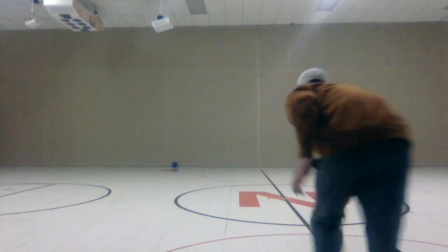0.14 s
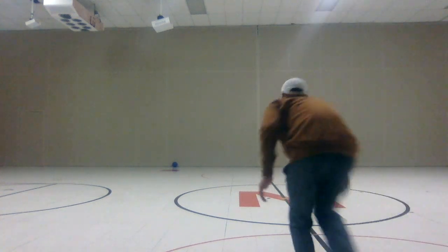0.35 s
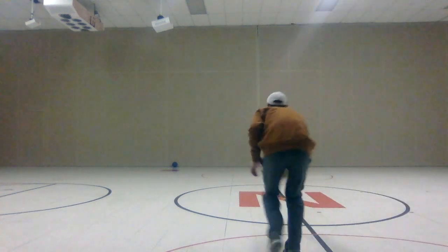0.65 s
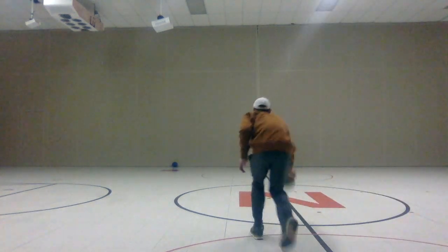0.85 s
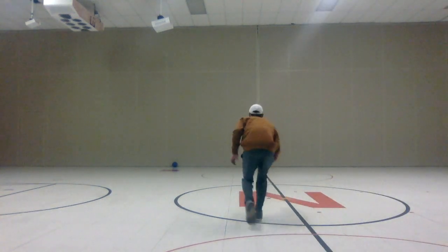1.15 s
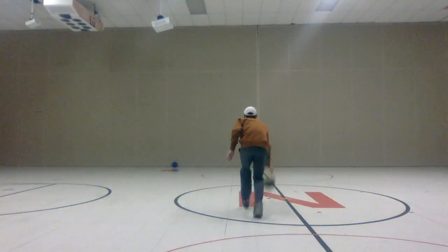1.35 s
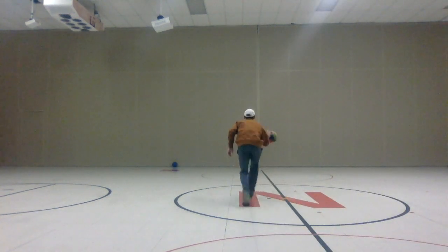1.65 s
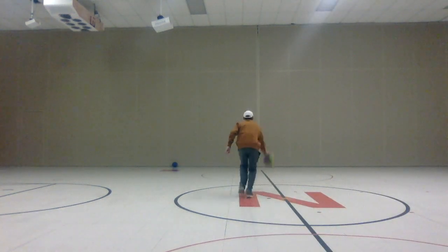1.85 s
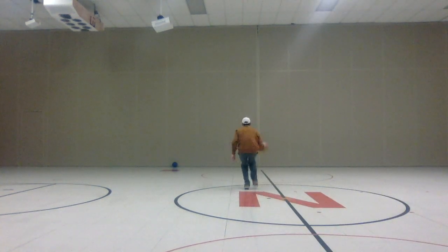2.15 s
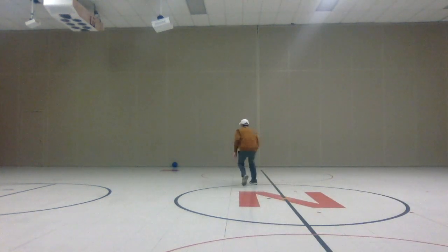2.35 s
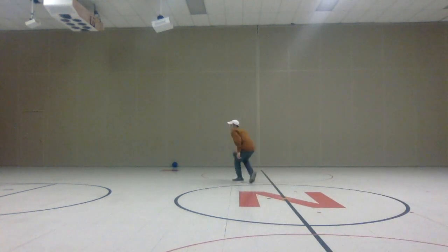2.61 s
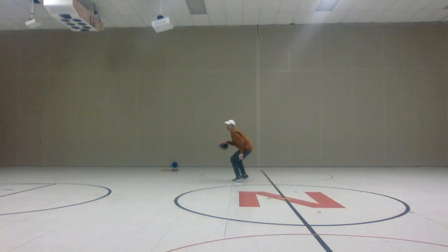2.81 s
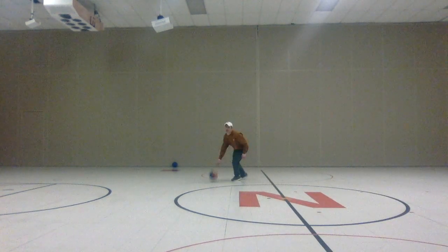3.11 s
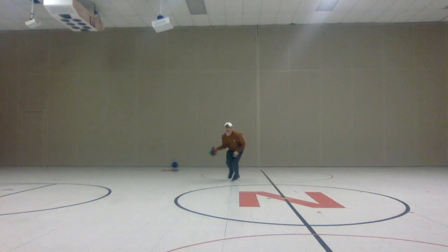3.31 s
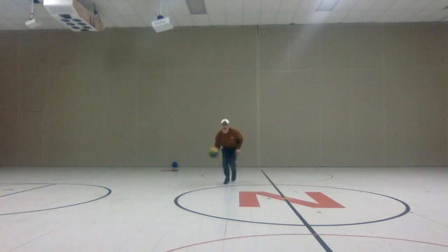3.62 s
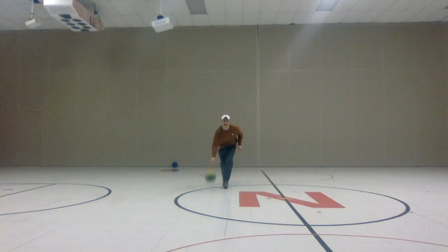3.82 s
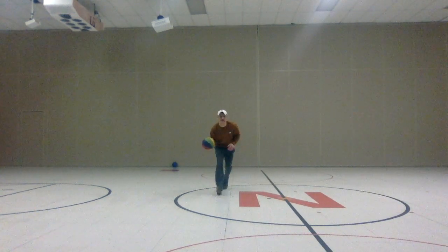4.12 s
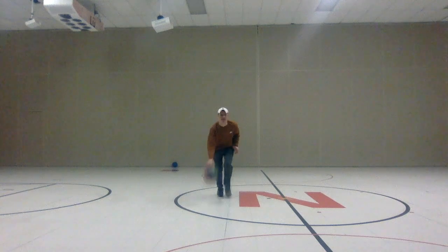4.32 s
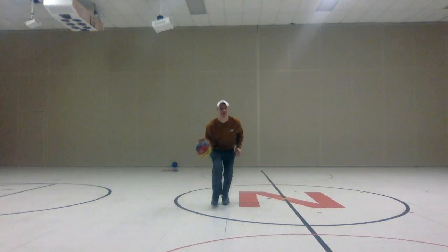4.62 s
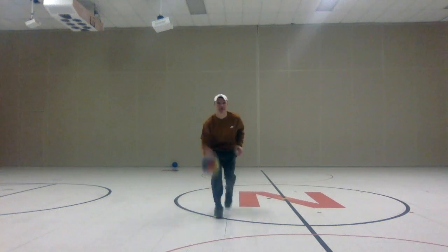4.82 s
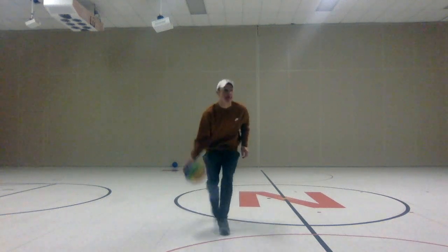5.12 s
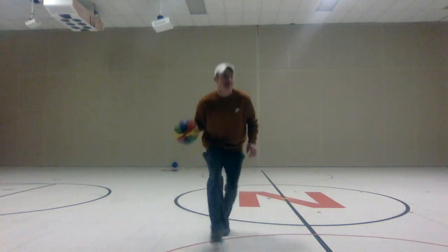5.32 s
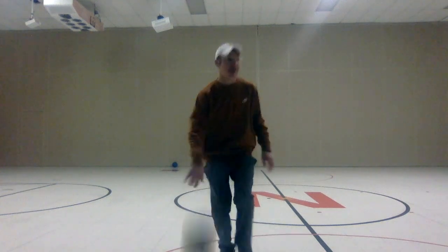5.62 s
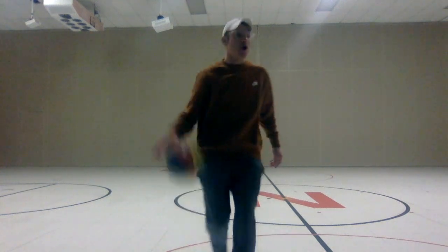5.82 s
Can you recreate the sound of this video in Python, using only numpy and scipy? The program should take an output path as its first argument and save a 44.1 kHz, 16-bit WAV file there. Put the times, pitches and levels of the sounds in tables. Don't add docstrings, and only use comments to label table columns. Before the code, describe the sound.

A rubber ball is dribbled steadily on a hard gym floor, ten sharp echoing slaps receding from the microphone and coming back.

```python
import sys
import numpy as np
from scipy import signal
from scipy.fft import rfft, irfft
from scipy.io import wavfile
from scipy.ndimage import map_coordinates

SR = 44100
rng = np.random.default_rng(int(sys.argv[2]) if len(sys.argv) > 2 else 0)


def generate_wav(sig):
    pcm = np.round(np.clip(np.atleast_2d(sig).T, -1, 1) * 32767).astype(np.int16)
    wavfile.write(sys.argv[1], SR, pcm)


def magnitude_from_level(level_db):
    exponent = np.asarray(level_db, float) / 20
    return 10 ** exponent


N = 262511


def at_hz(points, hz):
    table_hz, values = np.transpose(points)
    return np.interp(np.log(hz), np.log(table_hz), values)


def ring(hz, t60):
    t = np.arange(round(.12 * SR)) / SR
    return np.sin(2 * np.pi * hz * t) * magnitude_from_level(-60 * t / t60)


def add(track, s, sound):
    i = round(s * SR)
    track[i:i + len(sound)] += sound[:N - i]


def ventilation():
    # f/Hz, level/dB
    duct_colour = [(15, -38), (25, -43), (58, -7.5), (97, -11), (134, -5), (206, -15), (293, -7.5),
                   (560, -17.5), (695, -9), (818, -15), (962, -8.5), (1100, -14), (1370, -13),
                   (3430, -32.5), (16000, -63.5)]
    # t/s, level/dB
    background_level = [(0, -54), (.1, -58), (.3, -58.5), (.8, -55), (5.95, -54.5)]
    hz = np.fft.rfftfreq(N, 1 / SR) + 1
    air = irfft(rfft(rng.standard_normal(N)) * magnitude_from_level(at_hz(duct_colour, hz)), N)
    s, db = np.transpose(background_level)
    return air / air.std() * magnitude_from_level(np.interp(np.arange(N) / SR, s, db))


def slap(treble_db):
    # f/Hz, level/dB, t60/s
    skin_modes = [(3810, -3.5, 0.0029), (6400, -2, 0.0013), (2600, 2.5, 0.0032), (9300, -7.5, 0.0026),
                  (3080, -12, 0.0024)]
    sound = np.zeros(round(.12 * SR))
    for hz, db, t60 in skin_modes:
        spread_db = 2.5 * rng.standard_normal()
        sound -= magnitude_from_level(-7 + db + spread_db) * ring(hz, t60)
    sound[:5] -= magnitude_from_level(2.5) * np.hanning(5)
    sound = signal.lfilter(*signal.butter(2, 1900, "high", fs=SR), sound)
    dull = signal.lfilter(*signal.butter(2, 7000, fs=SR), sound)
    return dull + magnitude_from_level(treble_db) * (sound - dull)


def thump(low_db, upper_db, lag_s):
    t = np.arange(round(.12 * SR)) / SR
    cycles = 118 * t + .17 * (1 - np.exp(-t / .002))
    swell = 1 - np.exp(-t / .0011)
    low = -np.cos(2 * np.pi * cycles) * swell * magnitude_from_level(-60 * t / 0.038)
    low = np.interp(t - lag_s, t, low, left=0)
    upper = ring(278, 0.056) + 0.88 * ring(351, 0.022) + 0.097 * ring(757, 0.025)
    return magnitude_from_level(low_db + 17.0) * low - magnitude_from_level(upper_db + 2.5) * swell * upper


def air_ping(hz, level_db):
    # ratio to the main pitch, level/dB, t60/s
    air_modes = [(1, 0, .035), (1.08, -2, .04), (.91, -3, .035), (1.19, -6, .03), (1.85, -12, .02),
                 (.72, -12, .02)]
    ping = magnitude_from_level(level_db + 3.5) * sum(magnitude_from_level(db) * ring(ratio * hz, t60) for ratio, db, t60 in air_modes)
    return ping * np.clip(np.arange(len(ping)) / SR / 0.00088, 0, 1)


def echo_delay(place, path):
    surfaces = {"left": (0, -15.1), "right": (0, 13.17), "back": (1, -1.76), "far": (1, 10.55),
                "floor": (2, 0), "roof": (2, 4.54)}
    image = [*place, 0]
    for name in path.split():
        axis, position = surfaces[name]
        image[axis] = 2 * position - image[axis]
    return (np.linalg.norm(image) - np.hypot(*place)) / 343


def scattered(sound, delay_s):
    smear = .18 * rng.standard_normal(256) * magnitude_from_level(-60 * np.arange(256) / SR / .007)
    smear[0] = 1
    top_hz = np.clip(16000 - 70000 * delay_s, 3000, 18000)
    return signal.lfilter(*signal.butter(2, top_hz, fs=SR), np.convolve(sound, smear))


def add_echoes(track, s, place, away, sharp, ping, deep):
    # surfaces met in turn, level/dB with the ball at 1 m, share of the thump/dB
    echo_paths = [("back", -11.5, 1.5), ("roof", -11.5, -1.5), ("roof back", -20, 1.5), ("far", -17.5, -1),
                  ("far roof", -13.5, -2), ("far back", -17.5, 3), ("back far", -19, -7),
                  ("right", -15.5, -10), ("right back", -27, -3), ("right roof", -36, 8),
                  ("far roof floor roof", -24.5, -4), ("left roof", -17.5, 21), ("right far", -29.5, -11),
                  ("back far back", -29, -4.5), ("left far", -24, -16.5)]
    doublings = np.log2(np.hypot(*place))
    for path, echo_db, deep_db in echo_paths:
        luck, deep_luck = rng.standard_normal(2)
        delay_s = echo_delay(place, path)
        unshadowed_db = 4.5 * away * (delay_s > 0.02)
        gain = magnitude_from_level(echo_db + 1 * doublings + 1.87 * luck + unshadowed_db)
        add(track, s + delay_s, gain * magnitude_from_level(-2) * scattered(sharp[:400], delay_s))
        low = magnitude_from_level(min(deep_db + 3 * deep_luck, 6)) * deep
        add(track, s + delay_s, gain * (magnitude_from_level(10.0) * ping + low))


def shaped(x, gain):
    hz, s, spectra = signal.stft(x, SR, nperseg=512)
    spectra = spectra * gain(np.maximum(hz, 20)[:, None], s)
    return signal.istft(spectra, SR)[1][..., :x.shape[-1]]


def hall(first_s, gate_s):
    # f/Hz, t60/s
    hall_decay = [(70, 1), (150, 0.89), (350, 0.7), (700, 0.45), (1400, 0.82), (2800, 1), (5000, 0.96),
                  (7000, 0.68), (10000, 0.43), (14000, 0.22)]
    # f/Hz, level/dB
    hall_colour = [(40, -32), (150, -5), (350, -1), (700, 3), (1400, 7), (2000, 3.5), (2800, -1.5),
                   (4000, -1.5), (5600, -1.5), (9000, -4.5), (14000, -5)]
    tail_s, patchy_db = .9, 6
    gate_db, gate_fall_s, gate_bass_hz = -5, 0.029, 267
    gate_treble_db, gate_treble_hz = -12, 12000
    t = np.arange(round(tail_s * SR)) / SR
    shape = (len(first_s), len(t))
    density = np.clip(0.027 + (t / 0.23) ** 2, 0, 1)
    grains = rng.standard_normal(shape) * (rng.random(shape) < density) / np.sqrt(density)
    walls = 1 / (1 + np.exp(np.clip((first_s[:, None] - t) / .009, -50, 50)))
    clutter = magnitude_from_level(-4.5) * np.exp(-t / 0.055)
    onset = np.clip(t / 0.0044, 0, 1) * (clutter + walls)
    lumps = rng.standard_normal((len(first_s), 24, 12))

    def fading(hz, s):
        grid = np.broadcast_arrays(23 * np.sqrt(hz / (SR / 2)), 11 * s / s[-1])
        uneven = np.array([map_coordinates(lump, grid, order=1) for lump in lumps])
        closes_s = gate_s[:, None, None] / (1 + (hz / gate_treble_hz) ** 2)
        depth_db = gate_db * hz / (hz + gate_bass_hz) + gate_treble_db * hz / gate_treble_hz
        gated_db = depth_db / (1 + np.exp(np.clip((closes_s - s) / gate_fall_s, -50, 50)))
        decay_db = -60 * s / at_hz(hall_decay, hz)
        return magnitude_from_level(gated_db + at_hz(hall_colour, hz) + decay_db + patchy_db * uneven)

    return 0.36 * shaped(grains, fading) * onset * np.clip((tail_s - t) / .1, 0, 1)


def dribble():
    # t/s, force level/dB, upper thump level/dB, slap level/dB, slap level in the tail/dB
    bounces = [
        (0.3047, 0.5, -8.5, -2.2, 0.5),
        (0.8533, -1, 5, -0.5, 5),
        (1.4038, 0.6, 2, 0.5, -0.5),
        (2.0421, -1, -3, 1.5, 2),
        (2.58, -1, 4, -2, 1),
        (3.2041, -2.5, -15, 0.3, 3.5),
        (3.8675, -2.5, -3, 3.3, 0.9),
        (4.4715, 0, -5.5, 1.3, 1.5),
        (5.0261, 1.1, -20, 0.64, 0.1),
        (5.7061, 2.15, -11, 1, -1),
    ]
    # f/Hz, level/dB, level in the tail/dB
    pings = [(1663, -36, -0.5), (1398, -30.5, 1.5), (1266, -36, -3), (1293, -32, 10), (1207, -37.5, 6),
             (1389, -29.5, 6.5), (1293, -31.5, -3), (1240, -25, 0), (1307, -27, -1.5), (1522, -28, 3.5)]
    places = [(.37, 1.05), (1, 1.28), (1.17, 2.8), (1.02, 4.46), (.72, 5.79), (-.07, 5.6), (.26, 4.15),
              (.49, 2.69), (.44, 1.74), (-.34, .99)]
    booms = [1, 0.5, -1.5, 3.5, -3, -2, -0.7, 3, -3.4, -3.8]
    lag_s = .0008
    out = np.zeros(N)
    turned = np.array(bounces)[:, 0] < 2.9
    first_s = .008 + np.array([echo_delay(place, "far roof") for place in places])
    answers = hall(first_s, 0.29 + 0.014 * turned)
    for bounce, air, place, boom_db, away, answer in zip(bounces, pings, places, booms, turned, answers):
        s, force_db, upper_db, skin_db, bright_db = bounce
        ping_hz, ping_db, linger_db = air
        doublings = np.log2(np.hypot(*place))
        slap_db = -8 - 1.04 * doublings
        low_db = -16 - 1.95 * doublings - 2.5 * away
        punch_db = -31 - 3 * doublings + 25.5 * away
        treble_db = -6 - 1.46 * doublings + 3 * away

        deep = thump(force_db, force_db + upper_db, .002 * away)
        skin = magnitude_from_level(force_db + skin_db) * slap(treble_db)
        near_deep = magnitude_from_level(low_db) * deep
        sharp = magnitude_from_level(slap_db - 1 * away + 0.5) * skin
        punch = -magnitude_from_level(force_db + slap_db + punch_db) * ring(760, .018)
        ping = air_ping(ping_hz, ping_db)
        add(out, s + lag_s, near_deep + ping + sharp + punch)
        add(out, s + lag_s + .00031, magnitude_from_level(-11) * sharp)
        add_echoes(out, s, place, away, sharp, ping, near_deep)

        click = skin * magnitude_from_level(-60 * np.arange(len(skin)) / SR / 0.001)
        spread = magnitude_from_level(-36 + boom_db) * deep + magnitude_from_level(-29 + linger_db) * ping + magnitude_from_level(-26.5 + bright_db) * click
        add(out, s + lag_s, magnitude_from_level(1.5 * away) * signal.fftconvolve(spread, answer))
    return out


def shoes():
    # t/s, peak level/dB, f/Hz, low puff level/dB, tail
    # level/dB
    taps = [(2.436, -27.5, 3520, -29, -15), (2.45, -34, 1120, -31.5, -15), (2.466, -24, 2720, -67, -11.5),
            (2.474, -23, 2600, -48, -33), (2.482, -19.5, 1020, -40, -19), (2.502, -27.5, 4720, -50, -21),
            (2.509, -23, 960, -40, -26.5), (2.522, -29.5, 2000, -56, -22), (3.594, -46, 1100, -47, -30.5),
            (4.836, -42, 1360, -43.5, -19), (5.489, -46.5, 4250, -42, -17),
            (5.526, -22.5, 2570, -30, -29.5), (5.536, -32.5, 2700, -63, -41), (5.547, -31, 2320, -42, -42),
            (5.579, -60, 920, -51, -24)]
    out = np.zeros(N)
    answers = hall(np.full(len(taps), .02), np.full(len(taps), .12))
    soft = signal.butter(4, 6230, fs=SR, output="sos")
    for (s, peak_db, hz, puff_db, tail_db), answer in zip(taps, answers):
        knock = ring(hz, 0.013) + .45 * ring(1.62 * hz, 0.005)
        knock *= np.clip(np.arange(len(knock)) / SR / .0004, 0, 1)
        grit = rng.standard_normal(128) * np.exp(-np.arange(128) / 30)
        knock[:128] += magnitude_from_level(-20) * np.diff(grit, prepend=0)
        puff = magnitude_from_level(puff_db + 7.0) * ring(360, 0.0095)
        tap = signal.sosfilt(soft, magnitude_from_level(peak_db) * knock + puff)
        add(out, s, tap)
        brief = tap * magnitude_from_level(-60 * np.arange(len(tap)) / SR / 0.0081)
        add(out, s, magnitude_from_level(tail_db) * signal.fftconvolve(brief, answer))
    return out


def rustle():
    # t/s, level/dB
    rubs = [(5.38, -81), (5.44, -77), (5.491, -74), (5.55, -101), (5.6, -80)]
    grains = rng.standard_normal(N) * magnitude_from_level(3 * rng.exponential(1, N))
    hiss = 0.69 * signal.lfilter(*signal.iirpeak(6500, 9, fs=SR), grains)
    hiss += 0.22 * signal.lfilter(*signal.iirpeak(10000, 9, fs=SR), grains)
    s, db = np.transpose(rubs)
    return hiss / hiss.std() * magnitude_from_level(np.interp(np.arange(N) / SR, s, db, left=-120, right=-120))


def scene():
    return (ventilation() + dribble() + shoes() + rustle())[None]


def top_cut(x):
    return signal.sosfilt(signal.butter(12, 17080, fs=SR, output="sos"), x)


def record(dry):
    thin = signal.sosfilt(signal.butter(3, 80, "high", fs=SR, output="sos"), dry)
    thin = signal.sosfilt(signal.butter(14, 16100, fs=SR, output="sos"), thin)
    return top_cut(np.clip(thin, -1, 1))


dry = scene()
out = record(dry)
generate_wav(out)
```